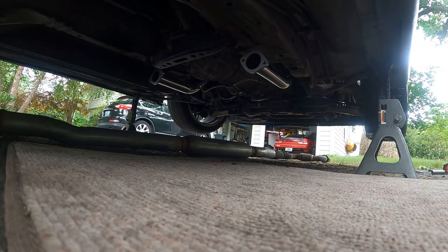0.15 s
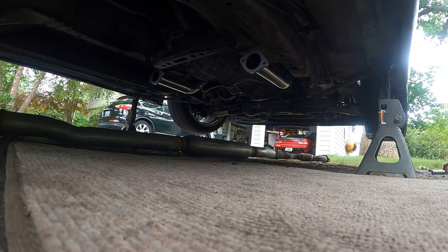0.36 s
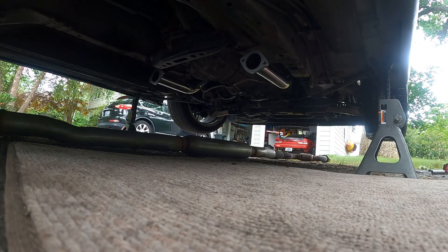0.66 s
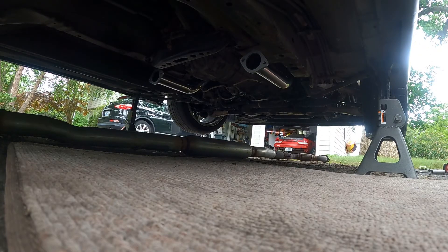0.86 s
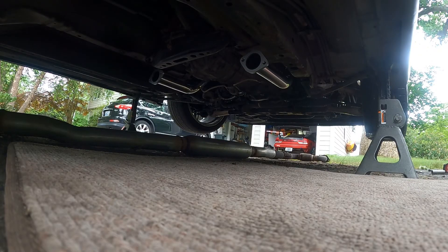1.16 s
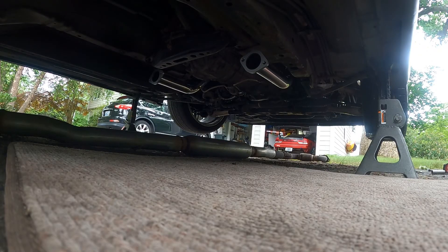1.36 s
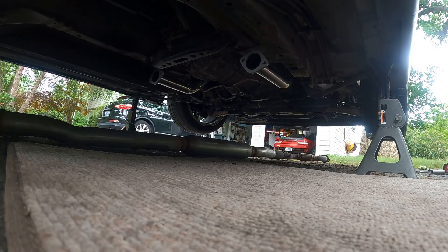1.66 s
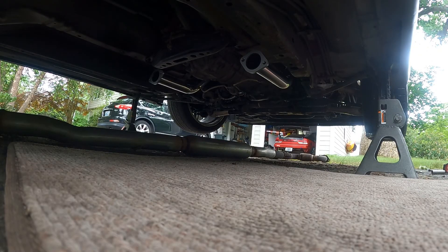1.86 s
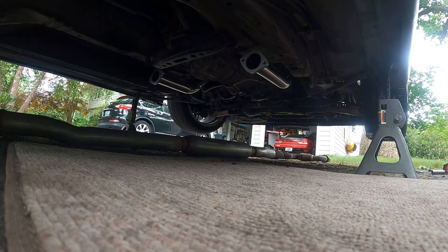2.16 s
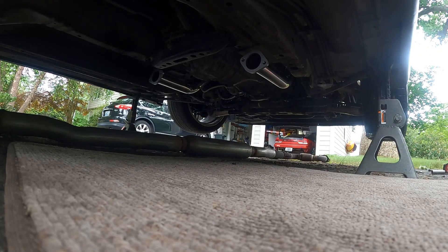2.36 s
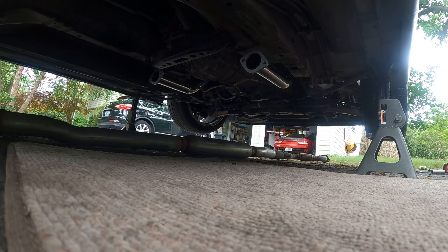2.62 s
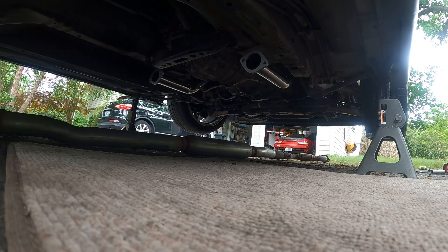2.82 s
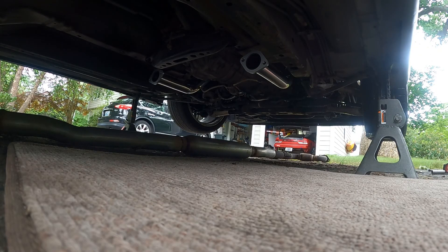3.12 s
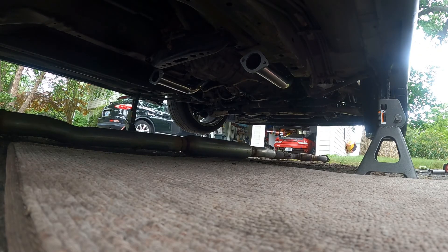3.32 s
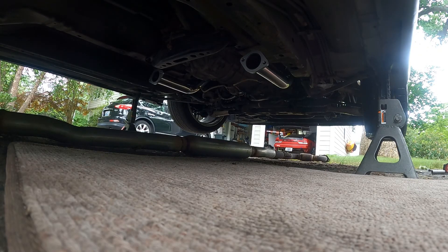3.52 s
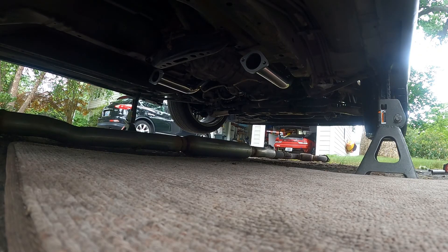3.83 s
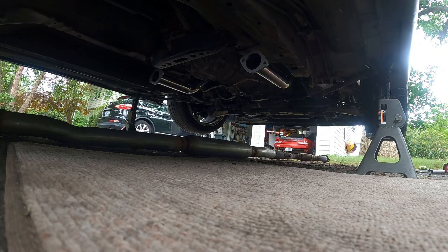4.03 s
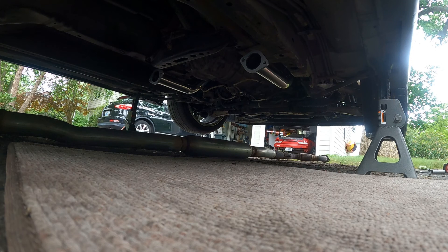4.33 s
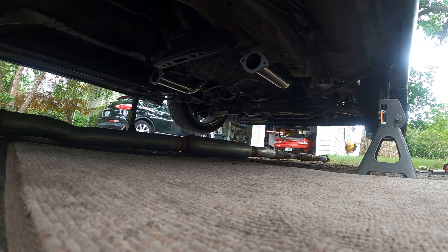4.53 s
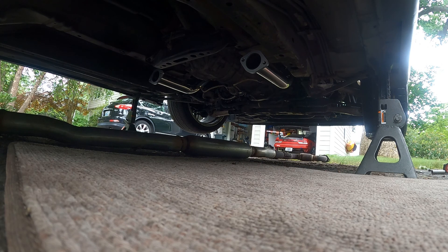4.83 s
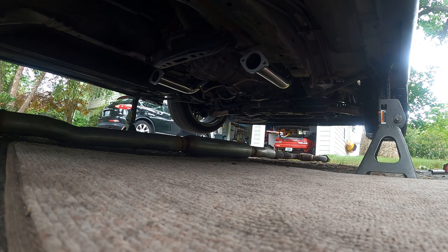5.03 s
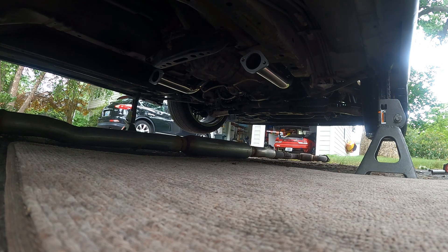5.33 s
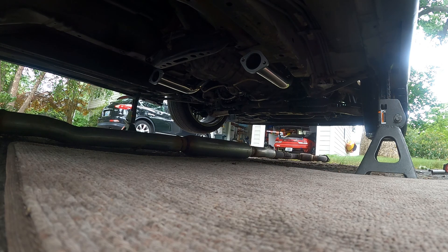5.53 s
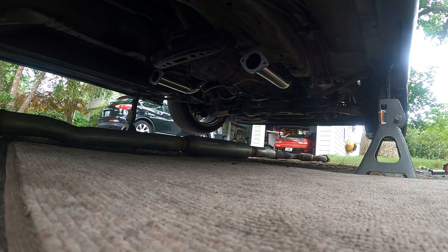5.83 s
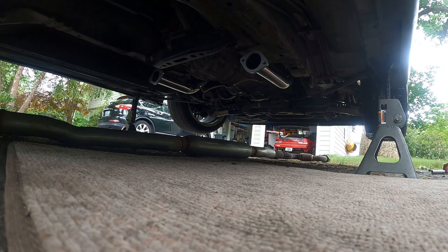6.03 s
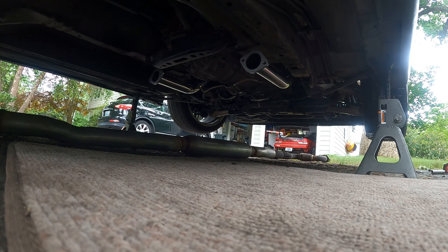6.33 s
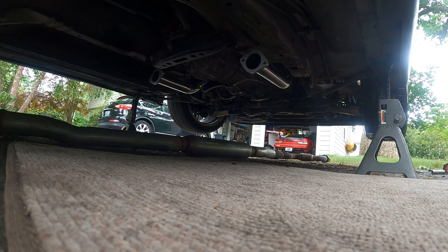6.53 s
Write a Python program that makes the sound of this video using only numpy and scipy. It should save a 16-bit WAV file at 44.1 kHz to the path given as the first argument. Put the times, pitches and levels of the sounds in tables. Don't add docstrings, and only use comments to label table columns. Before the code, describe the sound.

Brief whining gear grind, uneven coughs and flame cracks, then a very loud open-pipe engine bark with hissing gas and tinny rattles. The idle sags slightly, jumps in one quick rev, falls back to steady idling and cuts out. Hollow hums and separate airy puffs with buzzing heat shields slow down and fade. Outdoors in a driveway, microphone on the ground beneath the floor pan, short hard echoes, faint low yard rumble.

```python
import sys
import numpy as np
from scipy import signal
from scipy.fft import rfft, irfft
from scipy.io import wavfile
from scipy.ndimage import uniform_filter1d

SR = 44100
rng = np.random.default_rng(int(sys.argv[2]) if len(sys.argv) > 2 else 0)


def gain_from_decibels(decibels):
    exponent = np.asarray(decibels, float) / 20
    return 10 ** exponent


def generate_wav(signal):
    frames = np.transpose(np.atleast_2d(signal))
    scaled = np.clip(frames, -1, 1) * 32767
    pcm = np.round(scaled).astype(np.int16)
    wavfile.write(sys.argv[1], SR, pcm)


N = 294270
T = np.arange(N) / SR
IDLE_HZ, KEY_OFF_S = 36, 5.29
TONE_LAG = .011

# (time [s], bank rate = half the firing rate [Hz])
SPEED = [(0.66, 39.12), (0.76, 41.32), (0.92, 43.52), (1.05, 43.55), (1.3, 40.9), (1.6, 38.36),
         (2.1, 36.55), (2.8, 34.59), (3.05, 34.85), (3.13, 43.3), (3.24, 52.49), (3.33, 55.57),
         (3.44, 56.0), (3.6, 51.82), (3.85, 44.24), (4.15, 38.71), (4.55, 36.12), (5.27, 35.51)]
# (time [s], effort [dB])
EFFORT = [(.39, 18), (.61, 14.5), (.8, 6.5), (1.28, -4.5), (1.56, -5), (2.52, 2.5), (3.04, 1.5), (3.07, 11),
          (3.25, 6), (3.39, -5.5), (3.59, -10), (3.96, -8.5), (4.48, -1.5), (4.96, 2.5), (5.25, 0),
          (5.28, 6), (5.34, 5), (5.62, -4.5)]
# (time [s], level [dB])
MISFIRES = [
    (0.644, -13),
    (0.72, -12),
    (.787, 0.5),
    (0.826, -7.5),
    (2.99, -2),
    (5.58, -16),
]

# (frequency [Hz], density [dB per Hz])
YARD = [(18, -50.5), (30, -13.5), (76, -18.5), (157, -28.5), (724, -52), (1320, -45.5), (1540, -50),
        (2540, -51.5), (7090, -66), (12000, -92), (15600, -117), (22000, -120)]
# (frequency [Hz], width [Hz], level [dB])
GEAR_MODES = [(548, 88, -29), (1160, 110, -30.5), (2080, 25, -1), (2443, 200, -10.5), (3050, 77, -17),
              (3740, 130, 6.5), (4120, 47, 6), (4920, 180, -8.5), (6500, 140, -10)]
# (frequency [Hz], density [dB per Hz])
GRIND = [(71, -38.5), (120, -10.5), (200, -15.5), (300, -4), (420, -32), (524, -2), (725, -6), (1110, 1),
         (1630, -4), (4740, -13), (15000, -49.5)]
# (time [s], level [dB])
CLUNKS = [
    (0.013, -3),
    (0.1484, -7.5),
    (0.2734, -4.5),
    (0.325, -11),
    (0.394, -18),
]
# (time [s], level [dB])
CHUGS = [
    (0, -15),
    (.146, -13.5),
    (.272, -16.5),
    (0.327, -15.5),
    (.392, -18.5),
    (.62, -22.5),
    (.71, -19),
]
# (multiple of the mesh tone, level [dB])
WHINE = [(.25, -17), (0.501, -6), (.83, -8.5), (1, -3.5), (1.849, -7.5), (3.001, -16)]
# (time [s], level [dB])
CRANK_PUSH = [
    (0.0, 1),
    (.045, -2.5),
    (0.1, -5),
    (0.164, -20),
    (0.233, 4.5),
    (0.298, -12.5),
    (0.346, -4),
]
# (frequency [Hz], width [Hz], level [dB])
CAVITY = [(60.4, 3.45, 22), (72.1, 6.9, 17.5)]
# (centre time [s], level [dB], half length [s])
BOOM = [(.05, -13, 0.084), (.22, -14, 0.092), (.41, -10.5, 0.079), (.53, -26, .02), (5.95, -10.5, 0.051),
        (6.06, -13, 0.039), (6.132, -15.5, 0.037), (6.195, -18.5, 0.029), (6.255, -23, 0.035),
        (6.335, -28.5, 0.036), (6.42, -34.5, 0.053), (6.53, -43.5, 0.042), (6.63, -44.5, 0.047)]

# (time [s], peak level [dB], ring [Hz])
CATCH_CRACKS = [(0.3943, -6, 1800), (0.427, -5.5, 3950), (0.4602, -6.5, 2870), (0.4819, -5, 4370),
                (0.5041, -10.5, 1850), (0.519, -14.5, 3920), (0.539, -11, 2070), (0.5524, -8, 4700),
                (0.5704, -12, 1823), (0.583, -7.5, 4120), (0.6103, -7.5, 4630), (0.6517, -15, 1560),
                (0.6627, -14.5, 3800), (0.6885, -14, 4920), (0.7276, -14, 2440), (0.7615, -16.5, 3420),
                (0.8328, -25.5, 2630), (0.8568, -26.5, 1590)]
# (time [s], peak level [dB], ring [Hz])
IDLE_CRACKS = [(0.881, -25, 1630), (0.949, -18.5, 4540), (0.9938, -27, 1630), (1.017, -25, 1580),
               (1.0396, -25.5, 2655), (1.0869, -22.5, 4580), (1.1095, -28.5, 2860), (1.1334, -25.5, 1530),
               (1.1563, -27.5, 1550), (1.3253, -31.5, 1650), (1.9507, -25.5, 1580), (1.978, -31.5, 1810),
               (2.197, -25.5, 4020), (2.2671, -24, 1926), (2.3632, -22.5, 4120), (2.5042, -22, 4110),
               (2.561, -19, 3890), (2.7034, -23, 3800), (2.762, -26, 3950), (2.8643, -20, 2485),
               (2.9226, -21.5, 1810), (3.0225, -33, 2670)]
# (time [s], peak level [dB], ring [Hz])
REV_CRACKS = [(3.0486, -19.5, 2180), (3.0765, -26, 1520), (3.0745, -11.5, 4010), (3.1002, -19.5, 1480),
              (3.113, -19.5, 2545), (3.1248, -13.5, 4190), (3.168, -19.5, 1810), (3.188, -20, 1810),
              (3.2267, -25, 2160), (3.2453, -25.5, 4500), (3.283, -23, 4580), (3.3023, -23.5, 4480)]
# (time [s], peak level [dB], ring [Hz])
LATE_CRACKS = [(3.356, -26.5, 1500), (3.4091, -23, 1535), (3.4633, -27.5, 4200), (3.8005, -32.5, 4090),
               (3.9617, -31, 1724), (4.035, -32.5, 1520), (4.2133, -34, 1570), (4.3086, -31.5, 1800),
               (4.3627, -25.5, 2324), (4.4278, -25.5, 4420), (4.5099, -32, 1504), (4.566, -31, 1566),
               (4.595, -29, 1570), (4.649, -26.5, 4750), (4.73, -26.5, 2690), (4.759, -28.5, 4000),
               (4.841, -28.5, 2175), (4.87, -28, 1730), (4.9416, -24, 2080), (5.011, -22.5, 1486),
               (5.0658, -22.5, 2720), (5.1227, -28.5, 4260), (5.152, -30, 3740), (5.1765, -24, 1490),
               (5.207, -24.5, 1710), (5.284, -15, 2080)]
# (time [s], level [dB])
POPS = [(.652, -15.5), (1.709, -28), (2.363, -29), (3.41, -24.5), (4.844, -24), (.787, -7), (3.049, -20),
        (3.147, -11), (3.8, -27), (5.284, -22.5), (5.43, -23.5)]
# (frequency [Hz], width [Hz], level [dB])
POP_MODES = [(518, 90, -1.5), (705, 100, -1), (926, 100, -0.5), (1340, 194, -8)]

# (time [s], level [dB])
CATCH = [(0.3947, -16), (0.4271, -10.5), (0.4601, -7.5), (0.4801, -6.5), (0.502, 0), (0.518, 0),
         (0.5395, -8.5), (0.5542, -13), (0.5706, -18.5), (0.5826, -15), (0.5964, -19), (0.6104, -15.5)]
CYLINDER_DB = [-6, 0, 5, -4, -2, -5]
CYLINDER_HISS_DB = [-6, 0, -7, -2, -8, -2]
# (frequency [Hz], width [Hz], level [dB])
COUGH = [(120, 45, 2), (180.4, 60, -2.5)]
# (frequency [Hz], density [dB per Hz])
GAS = [(430, -29), (700, 1.5), (1000, -3.5), (1060, -8.5), (1290, -1), (1820, -9), (2420, -7.5),
       (3010, -16), (4150, -10.5), (5590, -16), (7190, -20), (8440, -34.5), (11800, -31.5), (15500, -53.5)]
SHIELDS_HZ = [1246, 1800, 2074, 2385, 2877, 3440, 3990, 4300, 4690]
# (firing rate [Hz], level [dB])
TONE = [(23, -55), (37, -31), (41, -21.5), (52, -22), (64, -13), (90, -12), (112, -13.5)]
# (multiple of the bank rate, level [dB], polarity after the echo from the open pipe end)
BANK_ORDERS = [(1, -17, -1), (3, -1.5, 0.79), (4, -4.5, 0.84), (5, 5, -0.46), (6, -1.5, -0.37),
               (7, -.5, 0.8), (8, -14, -1.2), (9, -5.5, -1.08), (11, -3, 1)]
# (frequency [Hz], level [dB])
HOT_PIPE = [(30, 1), (106, -6), (116, -14.5), (130, -2), (145, 0), (170, -1), (215, 3), (255, 4.5),
            (285, 3), (320, 1.5), (400, -7.5), (600, -31)]
# (frequency [Hz], width [Hz], level [dB])
UPPER = [(495.2, 30.7, 0.5), (535, 50, -2.5), (673, 67, -14), (790, 26, -13), (921, 44, -8.5),
         (1142, 60, -19.5)]
# (frequency [Hz], width [Hz], level [dB])
COLD_UPPER = [(265, 60, 2), (363, 46, -4.5), (465, 39, 1), (674, 54, -4.5), (900, 42, -9.5)]
# (multiple of the cycle rate, level [dB])
LOPE_ORDERS = [(4, -12), (8, -18), (28, -31), (29, -31), (10, -21), (11, -23), (13, -24), (14, -22),
               (16, -18), (17, -21), (19, -26), (20, -22), (22, -19), (23, -28), (25, -31), (26, -37)]
# (frequency [Hz], level [dB])
LOPE_PIPE = [(60, -35.5), (120, -20.5), (165, -23), (190, -10), (228, -11.5), (260, 0.5), (280, -6),
             (300, -3), (325, -9), (360, -21), (450, -30)]

# (frequency [Hz], level [dB])
COLD_PIPE = [(30, -34), (52, -4), (80, 0), (100, -9), (140, -13), (200, -18), (270, -30), (400, -40)]
# (centre time [s], level [dB], half length [s])
COAST = [
    (5.35, -22.5, 0.079),
    (5.5, -14.5, 0.06),
    (5.71, -12, 0.13),
    (5.87, -16.5, 0.019),
]
# (time [s], level [dB])
GASP = [
    (5.268, -49.5),
    (5.366, -47.5),
    (5.462, -43.5),
    (5.8, -65),
]
# (frequency [Hz], density [dB per Hz])
GASP_AIR = [(2940, -25), (5000, 2), (7620, -2), (8780, -10), (11600, -5), (12300, -5), (15500, -37)]
# (time [s], puff level [dB], heat-shield rattle [Hz], low puff level [dB])
PUFFS = [(5.5417, -23.5, 4610, -29.5), (5.5675, -35.5, 2080, -38), (5.587, -32.5, 4300, -39.5),
         (5.6108, -25, 2360, -33.5), (5.6345, -25.5, 4107, -39), (5.661, -37, 1561, -41),
         (5.684, -25.5, 1800, -40), (5.7141, -33, 1497, -41), (5.7413, -23.5, 1810, -40.5),
         (5.7779, -28, 7220, -40.5), (5.807, -26.5, 4640, -51), (5.8455, -30.5, 2060, -40),
         (5.882, -29.5, 1800, -40), (5.927, -33, 1810, -44.5), (5.977, -28.5, 4146, -42.5),
         (6.0431, -32.5, 2347, -47.5), (6.115, -32.5, 4200, -49.5), (6.168, -48.5, 1930, -51),
         (6.2478, -55, 1600, -67.5), (6.312, -48, 1810, -45), (6.379, -49, 1615, -50.5),
         (6.51, -59, 1623, -72), (6.571, -44.5, 1400, -57), (6.656, -60, 1986, -73)]
# (frequency [Hz], density [dB per Hz])
PUFF_AIR = [(590, -49), (1000, -31), (1110, 0), (1570, -17), (1820, -1.5), (3180, -6), (4260, -1),
            (7600, -9.5), (8600, -14.5), (15000, -32.5)]
# (frequency [Hz], width [Hz], level [dB])
PANELS = [(1810, 45, 0), (2360, 39, 0.5), (3500, 40, -8), (4130, 48, -2), (4300, 80, -0.5), (4610, 70, -6),
          (5130, 130, -9), (5940, 53, -12), (6600, 200, -14), (7300, 140, -16)]
# (frequency [Hz], width [Hz], level [dB])
KNOCK = [(125, 50, 1.5), (173.3, 132, 9), (276, 54, -18.5), (425, 76, -7.5), (508, 89, -10), (695, 52, -9)]
# (frequency [Hz], side minus mid level [dB])
WIDTH = [(60, -44.5), (110, -44), (200, -23.5), (380, -16), (700, -13), (1290, -9.5), (2380, -4.5),
         (4400, -5), (8120, -3), (15000, -9)]


def evened(x):
    return x / np.sqrt(np.mean(x ** 2) + 1e-20)


def steady(x, seconds):
    power = uniform_filter1d(uniform_filter1d(x ** 2, int(seconds * SR)), int(seconds * SR / 2))
    return x / np.sqrt(abs(power) + 1e-4 * np.mean(x ** 2))


def noise():
    return rng.standard_normal(N)


def curve(rows, fade=0.0033):
    s, db = np.transpose(rows)
    inside = np.clip((T - s[0]) / fade + 1, 0, 1) * np.clip((s[-1] - T) / fade + 1, 0, 1)
    return gain_from_decibels(np.interp(T, s, db)) * inside


def swells(rows):
    t = np.arange(0, N, 32) / SR
    return np.interp(T, t, sum(gain_from_decibels(db) * np.exp(-abs((t - s) / half) ** 3) for s, db, half in rows))


def colour(x, points):
    f, db = np.transpose(points)
    hz = abs(np.fft.fftfreq(8192, 1 / SR))
    gain_db = np.maximum(np.interp(np.log(hz + 1), np.log(f + 1), db), -100)
    log_gain = np.log(gain_from_decibels(gain_db))
    taps = np.fft.ifft(np.exp(np.conj(signal.hilbert(log_gain)))).real[:4096]
    return signal.oaconvolve(x, taps)[:N]


def ring(x, modes):
    t = np.arange(int(2.2 * SR / np.min(modes, 0)[1])) / SR
    shape = 0
    for hz, width, db in modes:
        decay = width ** 2 * t * np.exp(-1.55 * np.pi * width * t)
        shape = shape + gain_from_decibels(db) * decay * np.sin(2 * np.pi * hz * t)
    return signal.oaconvolve(x, shape)[:N]


def clicks(times, sizes):
    out = np.zeros(N)
    np.add.at(out, np.clip((np.asarray(times) * SR).astype(int), 0, N - 1), sizes)
    return out


def burst(train, t60, rise):
    t = np.arange(int(SR * .3)) / SR
    return signal.oaconvolve(train, (1 - np.exp(-t / rise)) * gain_from_decibels(-60 * t / t60))[:N]


def bank_turns():
    s, hz = np.transpose(SPEED)
    pickup = 44.64 - (44.64 - hz[0]) * np.exp((s[0] - T) / .125)
    friction = np.exp(-np.maximum(T - KEY_OFF_S, 0) / .6)
    bank_hz = np.where(T < s[0], np.maximum(pickup, 18), np.interp(T, s, hz) * friction)
    turns = np.cumsum(bank_hz) / SR
    return turns - turns[SR] + 16.724, bank_hz


def follow(bank_hz, idle_db, per_db, per_hz, misfire):
    t = np.arange(0, N, 32) / SR
    missed_db = sum(db * np.exp(-((t - s) / 0.013) ** 2) for s, db in MISFIRES)
    effort_db = per_db * np.interp(t, *np.transpose(EFFORT))
    speed_db = per_hz * (bank_hz[::32] - IDLE_HZ)
    return np.interp(T, t, gain_from_decibels(idle_db + effort_db + speed_db + misfire * missed_db))


def yard():
    return gain_from_decibels(-51.5 - 1.5) * evened(colour(noise(), YARD))


def starter():
    teeth = noise() * gain_from_decibels(2.0 * evened(uniform_filter1d(noise(), 120)))
    housing = ring(teeth, np.array(GEAR_MODES[:2]) * [1, 1.1, 1])
    whir = evened(evened(colour(teeth, GRIND)) + 0.38 * evened(housing))
    s, db = np.transpose(CLUNKS)
    knock = burst(clicks(s, gain_from_decibels(db - 3.0)), 0.02, 0.00081) * evened(colour(noise(), GRIND))
    engaged = np.clip((.8 - T) / 0.44, 0, 1)

    start, strain_db = np.transpose(CHUGS)
    last = np.maximum(np.searchsorted(start, T) - 1, 0)
    sag_db = 90 * (T - start[last])
    strain = uniform_filter1d(gain_from_decibels(strain_db[last] - sag_db), size=300)

    since = T - start[np.minimum(last, 2)]
    load = 1 - 2.1 * np.minimum(since, .075)
    wobble = 1 + .014 * evened(uniform_filter1d(teeth, size=400))
    mesh = np.cumsum(1168 * load * wobble) / SR
    beat = 1 + 0.66 * np.cos(2 * np.pi * 44 * (since - .016))
    beat = beat * np.clip(since / .004, 0, 1) * np.clip((.085 - since) / .015, .1, 1)
    tones = sum(gain_from_decibels(db) * np.sin(2 * np.pi * k * mesh) for k, db in WHINE)
    whine = gain_from_decibels(-24) * beat * (T < .39) * tones
    return whir * strain * gain_from_decibels(-4.5) * engaged + knock + whine


def boom():
    caught = np.array(CATCH)[:4] * [1, 0]
    last_puffs = np.array(PUFFS)[[12, 15, 16, 17], :2] * [1, 0]
    s, db = np.transpose(np.r_[np.array(CRANK_PUSH), caught, last_puffs])
    rung = ring(clicks(s, gain_from_decibels(db)), CAVITY)
    lasting = ring(noise(), CAVITY)
    return steady(evened(rung) + .1 * evened(lasting), .035) * swells(BOOM)


def cracks():
    out, t = np.zeros(N + 2000), np.arange(2000) / SR
    band = signal.butter(3, [1500, 6200], "bandpass", fs=SR)
    for s, db, hz in CATCH_CRACKS + REV_CRACKS + IDLE_CRACKS + LATE_CRACKS:
        flame, flutter = rng.standard_normal((2, len(t)))
        fizz = signal.lfilter(*band, flame)
        note = np.sin(2 * np.pi * hz * t) * evened(uniform_filter1d(flutter, size=70))
        envelope = (1 - np.exp(-t / 0.00034)) * gain_from_decibels(db - 5.0 - 60 * t / 0.042)
        out[int(s * SR):int(s * SR) + len(t)] += envelope * (0.58 * fizz + 0.82 * note)
    s, db = np.transpose(POPS)
    one_pop = ring(clicks([0], 1.), POP_MODES)
    return out[:N] + ring(clicks(s, gain_from_decibels(db)), POP_MODES) / abs(one_pop).max()


def firings(turns):
    early, early_db = np.transpose(CATCH)
    count = np.floor(2 * turns - .2).astype(int)
    running = (T[1:] > .62) & (T[1:] < PUFFS[0][0] - .01)
    fired = np.flatnonzero((np.diff(count) > 0) & running) + 1
    times = np.r_[early, T[fired]]
    cylinder = np.r_[np.arange(len(early)), count[fired]] % 6
    luck = rng.standard_normal((len(times), 4))
    size = gain_from_decibels(np.take(CYLINDER_DB, cylinder) + 1.2 * luck[:, 0])
    spit_db = np.take(CYLINDER_HISS_DB, cylinder) + 4 + 2.3 * luck[:, 2:].T
    spit_db[:, :len(early)] = early_db - early_db.mean()
    return times, size, luck, spit_db


def coughs():
    s, db = np.transpose(CATCH[:8])
    return -ring(clicks(s, gain_from_decibels(0.36 * db)), COUGH) * gain_from_decibels(-22.0)


def gas_hiss(times, spit_db):
    dull = .4 + evened(burst(clicks(times, gain_from_decibels(spit_db[0])), .036, 0.0043))
    bright = .25 + evened(burst(clicks(times, gain_from_decibels(spit_db[1])), .028, 0.0043))
    gas = np.array(GAS)
    low_part = gas - 20 * (gas[:, :1] > 4600) * [0, 1]
    high_part = gas - 20 * (gas[:, :1] < 2700) * [0, 1]
    hiss = colour(dull * noise(), low_part) + colour(bright * noise(), high_part)
    panel = rng.integers(0, len(SHIELDS_HZ), len(times))
    rattle = 0
    for k, hz in enumerate(SHIELDS_HZ):
        rattle = rattle + ring(clicks(times, gain_from_decibels(spit_db[0]) * (panel == k)), [(hz, 65, 0)])
    return evened(hiss) + 0.24 * evened(rattle)


def firing_tone(turns, fast, bank_hz):
    pulse = np.sqrt(2) * np.cos(4 * np.pi * (turns - TONE_LAG * fast))
    pulse = pulse * gain_from_decibels(np.interp(2 * bank_hz, *np.transpose(TONE)))
    uneven = 1 + 0.073 * np.cos(2 * np.pi * (turns / 3 + 0.34))
    return pulse * uneven * follow(bank_hz, idle_db=.01, per_db=0.099, per_hz=0.011, misfire=0.51)


def pipe_bark(turns, bank_hz, swing, warm):
    effort = np.interp(T, *np.transpose(EFFORT))
    load_db = .35 * np.maximum(effort - 1.5, 0) * (T < KEY_OFF_S - .03)
    bark = 0
    for k, db, sign in BANK_ORDERS:
        level_db = db + np.interp(k * bank_hz, *np.transpose(HOT_PIPE))
        level_db = level_db - load_db * np.clip((k * bank_hz - 205) / 40, 0, 1)
        level_db = level_db - 1.33 * (2 - warm) * max(k - 5, 0)
        lag = .16 * (k > 6)
        bark = bark + sign * gain_from_decibels(level_db) * np.cos(2 * np.pi * (k * turns + swing + 0.077 - lag))
    return steady(bark, 0.07) * np.clip((T - 0.4) / 0.033, 0, 1)


def upper_ring(times, size, luck, spit_db, off):
    swirl = ring(burst(clicks(times, size), .05, .002) * noise(), UPPER)
    near = ring(clicks(times, gain_from_decibels(spit_db[0] - 2.5)), UPPER[4:])
    both = ring(clicks(times, size * gain_from_decibels(luck[:, 1])), UPPER[:4])
    hot = evened(both + near) + .9 * evened(swirl)
    cold = evened(ring(clicks(times, size), COLD_UPPER))
    return steady(hot, 0.16) * (1 - 0.81 * off) + 1.26 * off * cold


def lope(turns, swing, times, luck):
    cycle = 2 * np.pi * (turns + 1.005) / 3
    lead = 2 * np.pi * (swing + .2)
    out = 0
    for k, db in LOPE_ORDERS:
        pair = np.angle(1 - np.exp(-2j * np.pi * k * .95 / 6))
        out = out + gain_from_decibels(db) * np.cos(k * cycle + lead + pair)
    return colour(out * gain_from_decibels(np.interp(T, times[::6], 1.5 * luck[::6, 0])), LOPE_PIPE)


def engine():
    turns, bank_hz = bank_turns()
    fast = np.maximum(bank_hz - IDLE_HZ, 0)
    turns = turns + TONE_LAG * fast
    swing = .28 * fast / 5 * np.exp(1 - fast / 5) - .012 * fast
    times, size, luck, spit_db = firings(turns)
    warm = np.clip((T - .6) / .5, 0, 1) * np.clip((5.285 - T) / .03, 0, 1)
    off = np.clip((T - KEY_OFF_S) / 0.034, 0, 1)

    hiss = steady(gas_hiss(times, spit_db), 0.066)
    hiss = hiss * follow(bank_hz, idle_db=-37, per_db=1.0534, per_hz=0.19, misfire=0.86)
    bark = pipe_bark(turns, bank_hz, swing, warm)
    bark = bark * follow(bank_hz, idle_db=-16, per_db=0.43, per_hz=0.31, misfire=0.9)
    bark = bark * gain_from_decibels(-4 * np.exp((CATCH[0][0] - T) / 1.8))
    upper = upper_ring(times, size, luck, spit_db, off)
    upper = upper * follow(bank_hz, idle_db=-29.5, per_db=0.2564, per_hz=0.34, misfire=.5)
    unfired = gain_from_decibels(-4.5 * np.clip((T - KEY_OFF_S) / 0.027, 0, 1))
    turning = curve(np.array(EFFORT) * [1, 0])
    loping = lope(turns, swing, times, luck) * warm
    loping = loping * follow(bank_hz, idle_db=1, per_db=0.034, per_hz=0.21, misfire=.5)
    tone = firing_tone(turns, fast, bank_hz)
    return tone + coughs() + loping + turning * ((bark + upper) * unfired + hiss)


def intake_gasp(turns):
    air = evened(colour(noise(), GASP_AIR)) * curve(GASP)
    return air * (1 + 0.55 * np.cos(4 * np.pi * turns))


def coast_hum(turns):
    hum = 0
    for k in range(3, 17):
        level_db = -14. * (k % 2) - 1.2 * abs(k - 4)
        hum = hum + gain_from_decibels(level_db) * np.cos(2 * np.pi * k * (turns + .11 * k))
    return steady(colour(hum, COLD_PIPE), 0.062) * swells(COAST)


def puffs():
    s, puff_db, rattle_hz, low_db = np.transpose(PUFFS)
    t60 = np.maximum(0.11 + 0.002 * (low_db - puff_db), .08)[:, None]
    first = int(s[0] * SR)
    since = np.maximum(T[first:] - s[:, None], 0)

    def envelope(longer):
        fall_db = puff_db[:, None] - 8.5 - 60 * since / t60 / longer
        return np.r_[np.zeros(first), ((1 - np.exp(-since / 0.0035)) * gain_from_decibels(fall_db)).sum(0)]

    last = np.maximum(np.searchsorted(s, T) - 1, 0)
    rattle = np.sin(2 * np.pi * np.cumsum(rattle_hz[last]) / SR) * evened(uniform_filter1d(noise(), 400))
    breath = noise()
    air = evened(colour(breath, PUFF_AIR)) * np.where(T < 6.2, 1, .4)
    hum = .6 * rattle + 0.33 * (T < 6.2) * evened(ring(breath, PANELS))
    return envelope(1) * air + envelope(1.55) * hum


def low_puffs():
    s, _, _, low_db = np.transpose(PUFFS)
    body = KNOCK[2:] + UPPER[3:] + [(1340, 490, -18.5), (2330, 1100, -28.5)]
    low = burst(clicks(s, gain_from_decibels(low_db)), 0.17, 0.0023) * evened(ring(noise(), body))
    thump_db = low_db + 8 - 6.5 * (s - s[0])
    thump = burst(clicks(s, gain_from_decibels(thump_db) * (s < 6.2)), 0.36, 0.0071)
    return low + thump * evened(ring(ring(noise(), KNOCK[:2]), KNOCK[1:2]))


def block_rock():
    return burst(clicks([6.4], gain_from_decibels(-42)), .3, 0.017) * np.sin(2 * np.pi * 197 * T)


def run_down():
    turns, _ = bank_turns()
    return intake_gasp(turns) + coast_hum(turns) + puffs() + low_puffs() + block_rock()


def underside(x, t60):
    taps, at = np.zeros(4000), np.arange(40, 3960, 20) + rng.integers(0, 20, 196)
    taps[at] = rng.choice([-1., 1.], len(at)) * gain_from_decibels(-60 * at / SR / t60)
    return signal.oaconvolve(x, taps / np.linalg.norm(taps))[:N]


def scene():
    mid = yard() + starter() + boom() + cracks() + engine() + run_down()
    stir_hz = 14 + 8 * evened(uniform_filter1d(noise(), 2000))
    stir = 2 * np.pi * np.cumsum(stir_hz) / SR
    echoes = underside(mid * np.cos(stir), .04) + underside(mid * np.sin(stir), .04)
    side = colour(echoes, np.array(WIDTH) + [0, -2.5])
    late = irfft(rfft(mid) * np.exp(-2j * np.pi * .52 * np.fft.rfftfreq(N)), N)
    return np.array([late + side, mid - side])


def roll_off(x):
    return signal.sosfilt(signal.butter(12, 15000, fs=SR, output="sos"), x)


def record(dry):
    return roll_off(1.256 * np.tanh(dry / 1.293))


dry = scene()
out = record(dry)
generate_wav(out)
```